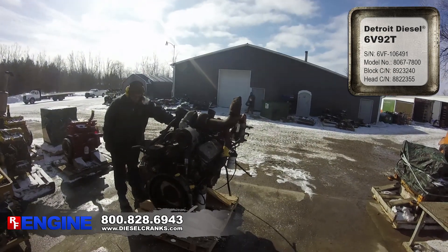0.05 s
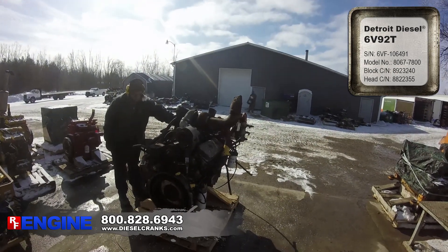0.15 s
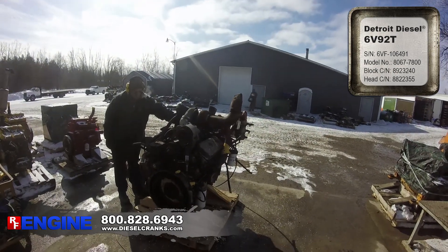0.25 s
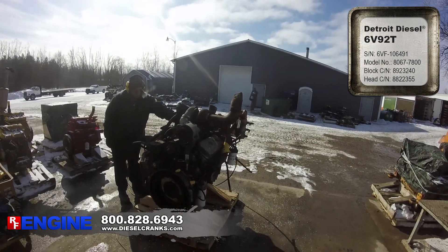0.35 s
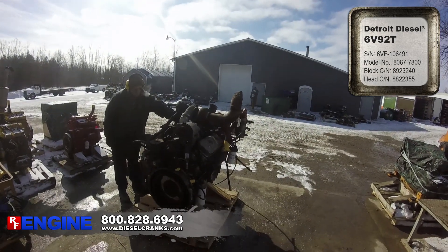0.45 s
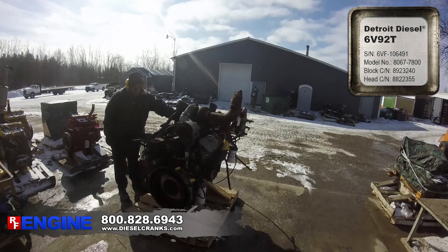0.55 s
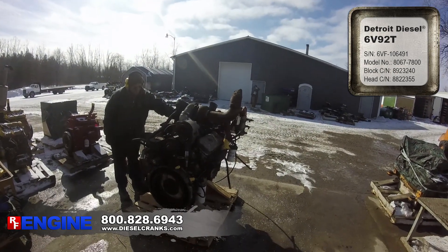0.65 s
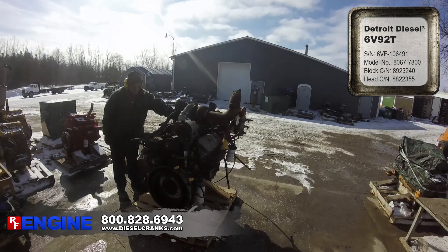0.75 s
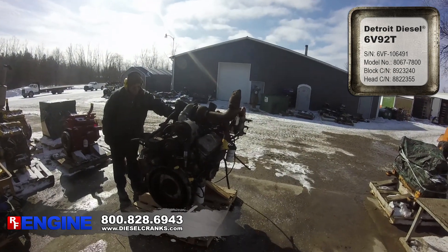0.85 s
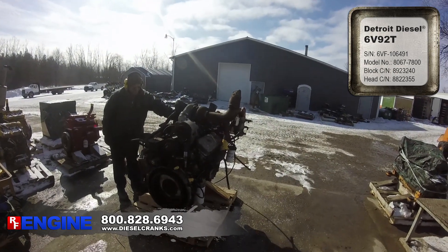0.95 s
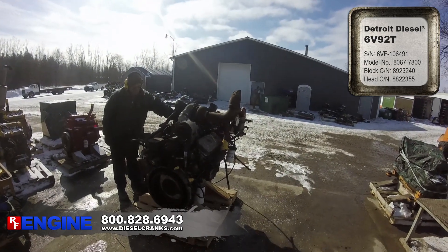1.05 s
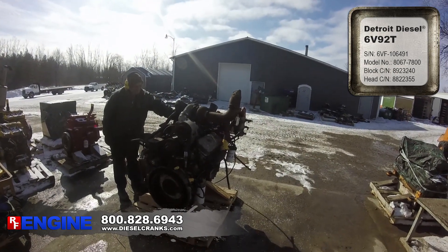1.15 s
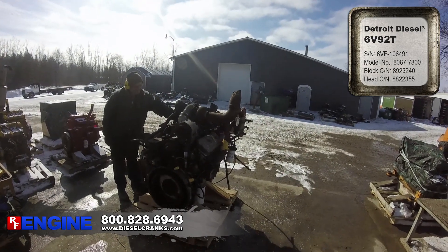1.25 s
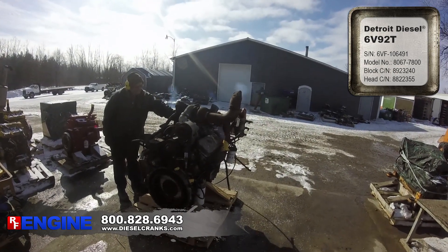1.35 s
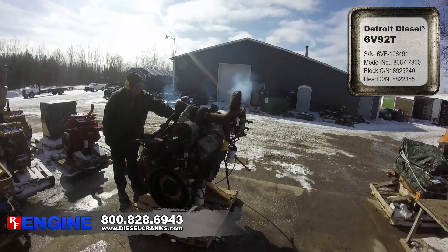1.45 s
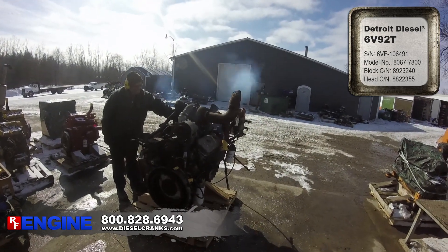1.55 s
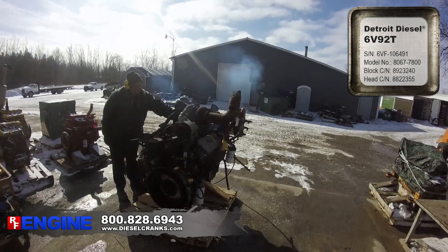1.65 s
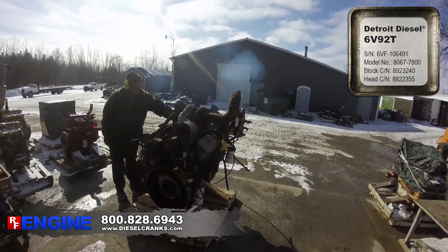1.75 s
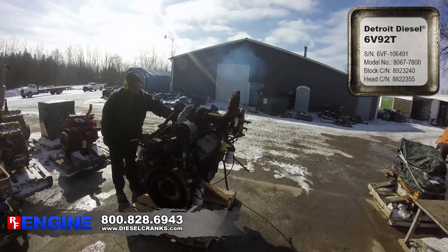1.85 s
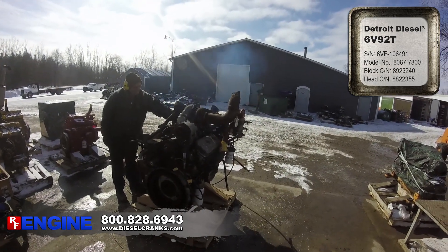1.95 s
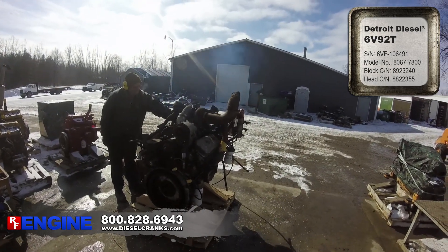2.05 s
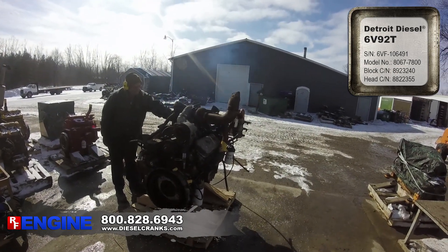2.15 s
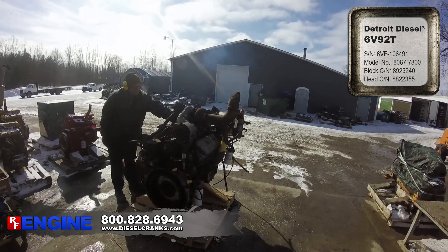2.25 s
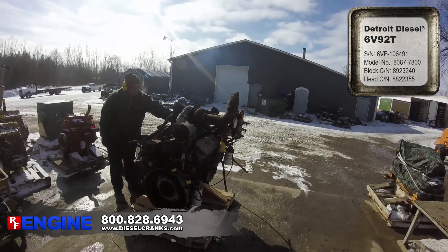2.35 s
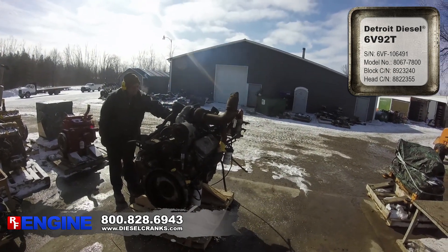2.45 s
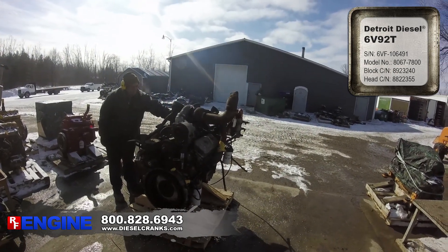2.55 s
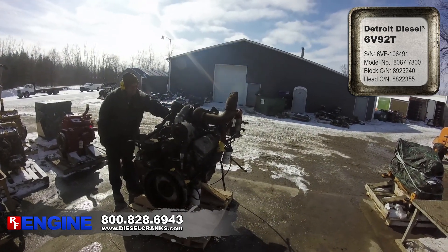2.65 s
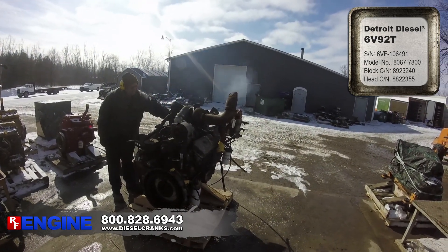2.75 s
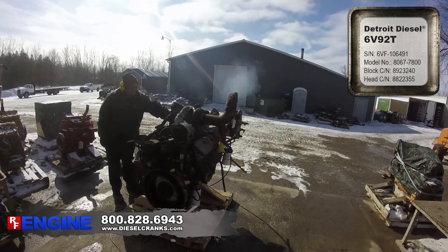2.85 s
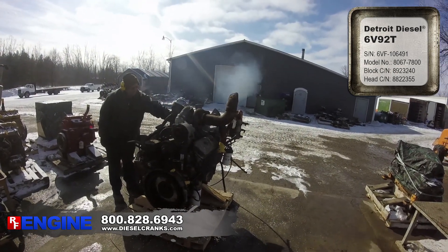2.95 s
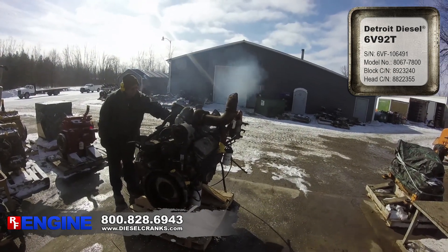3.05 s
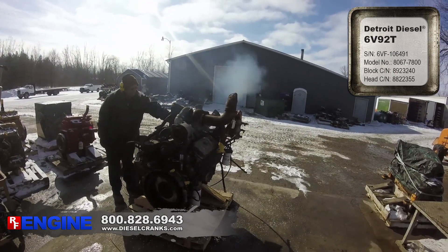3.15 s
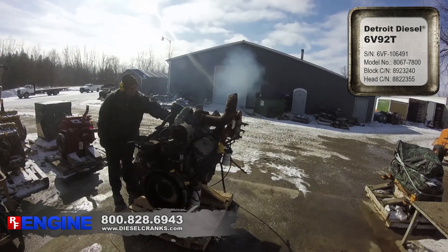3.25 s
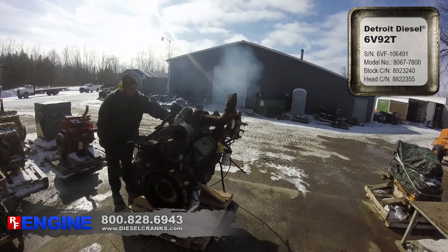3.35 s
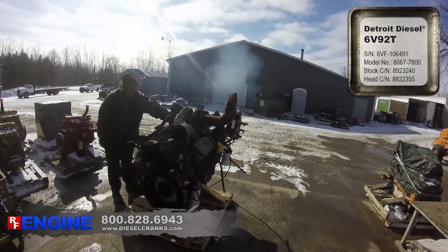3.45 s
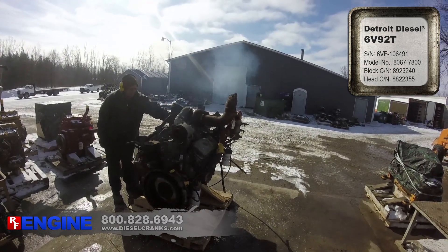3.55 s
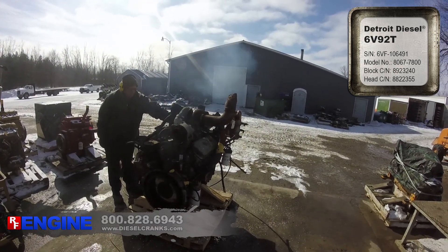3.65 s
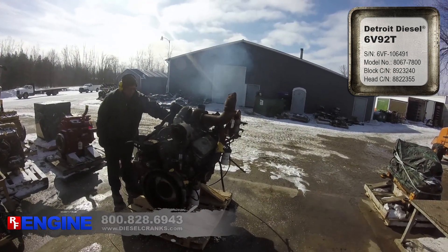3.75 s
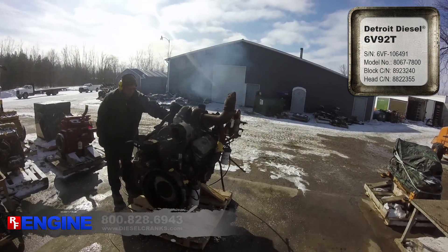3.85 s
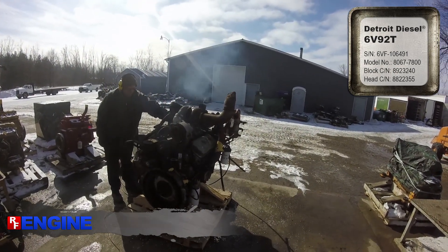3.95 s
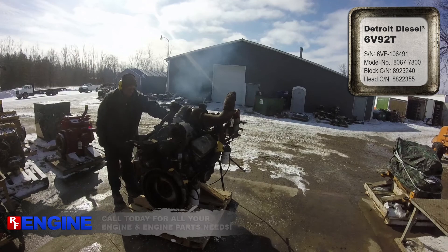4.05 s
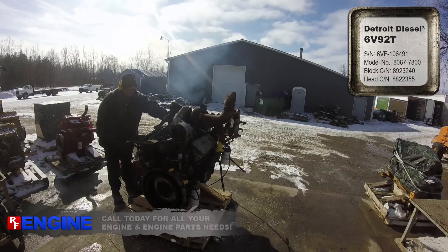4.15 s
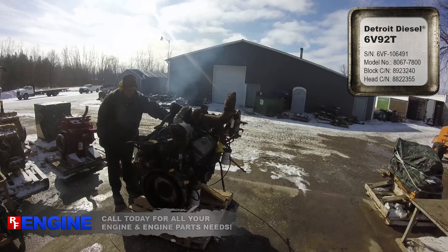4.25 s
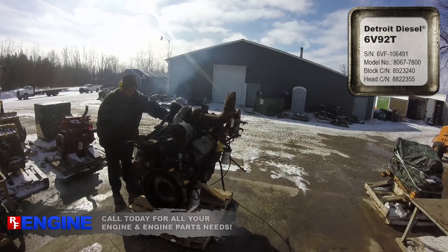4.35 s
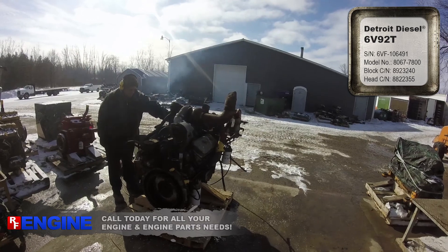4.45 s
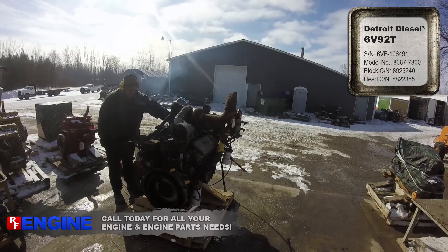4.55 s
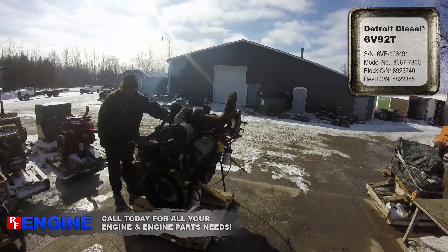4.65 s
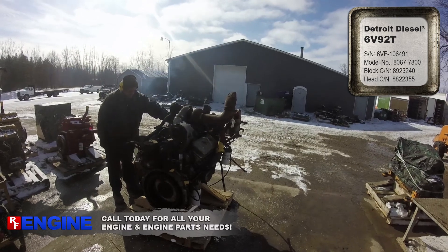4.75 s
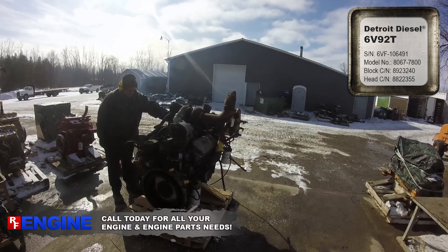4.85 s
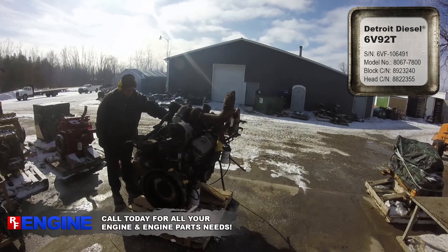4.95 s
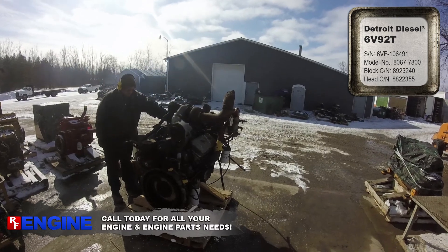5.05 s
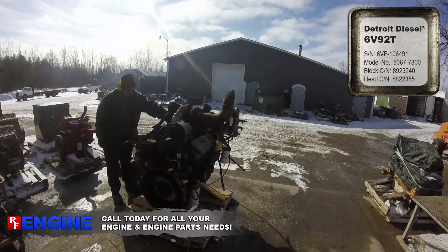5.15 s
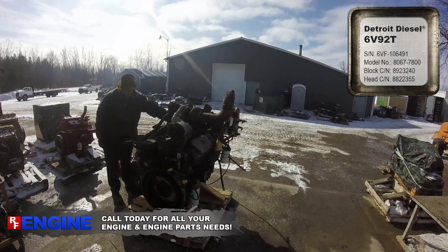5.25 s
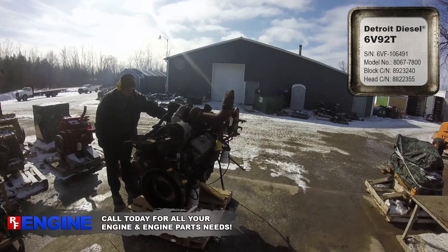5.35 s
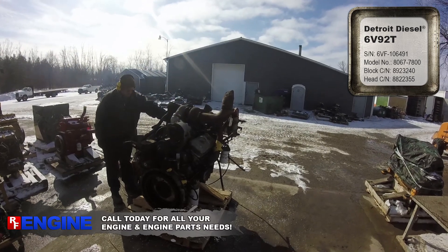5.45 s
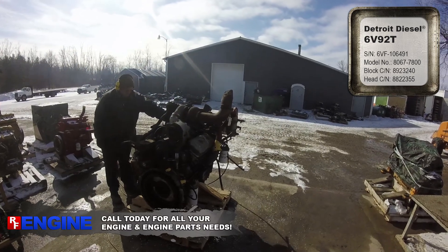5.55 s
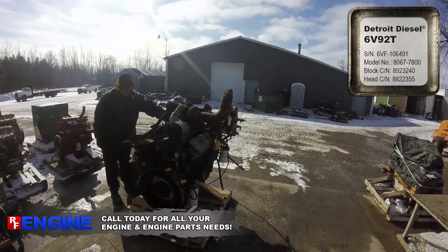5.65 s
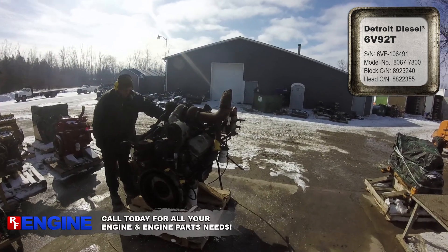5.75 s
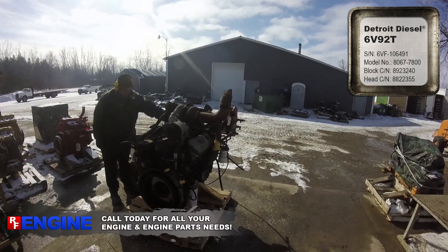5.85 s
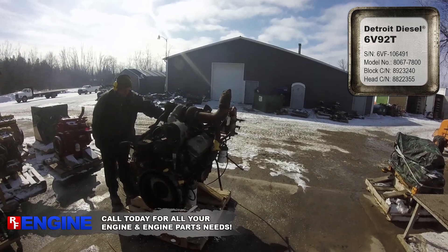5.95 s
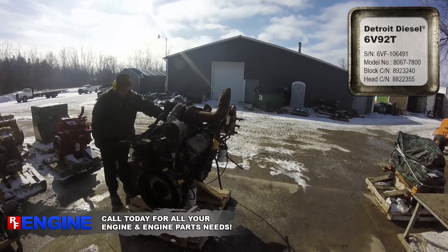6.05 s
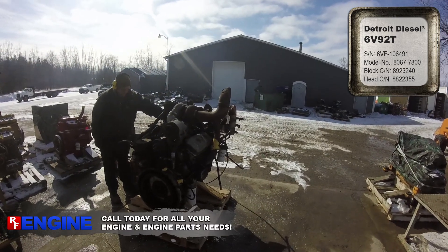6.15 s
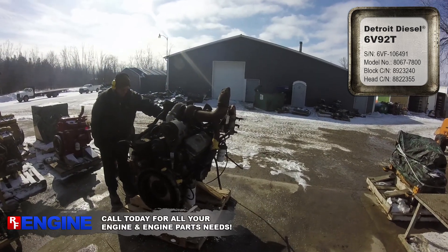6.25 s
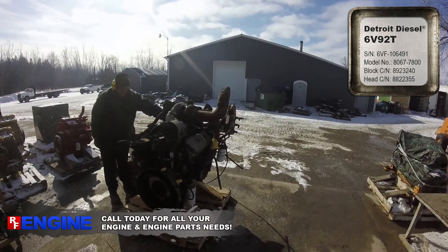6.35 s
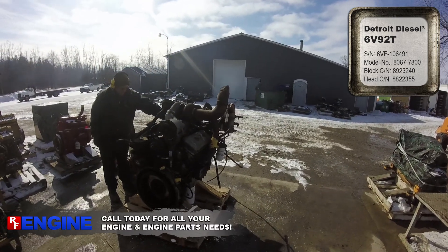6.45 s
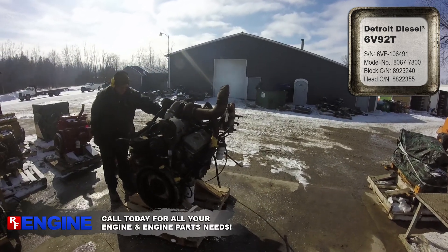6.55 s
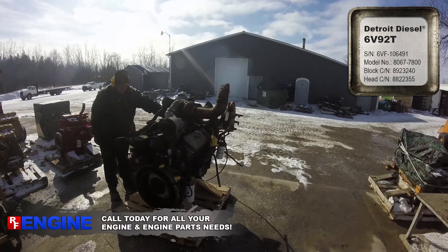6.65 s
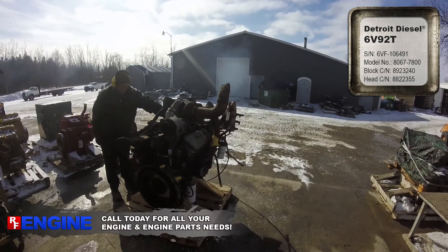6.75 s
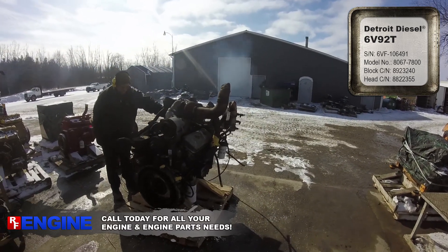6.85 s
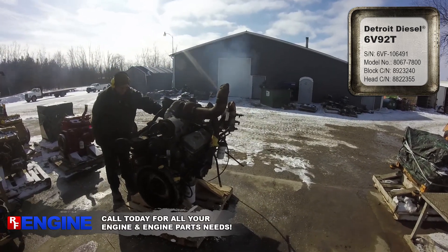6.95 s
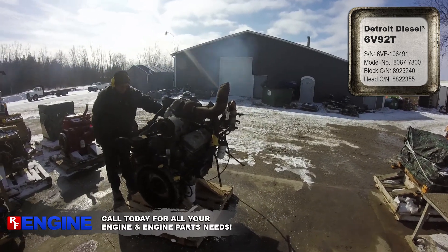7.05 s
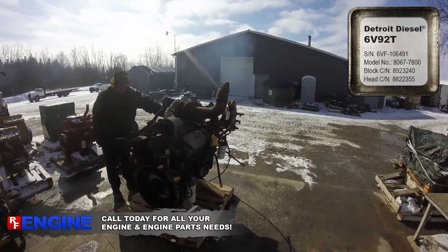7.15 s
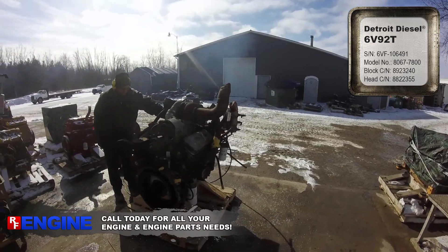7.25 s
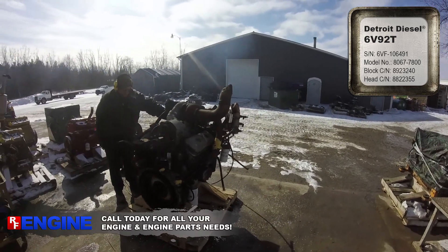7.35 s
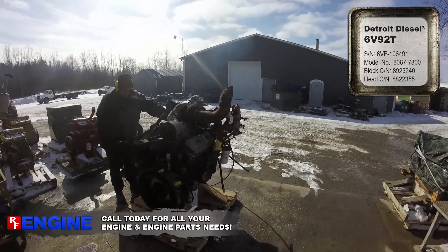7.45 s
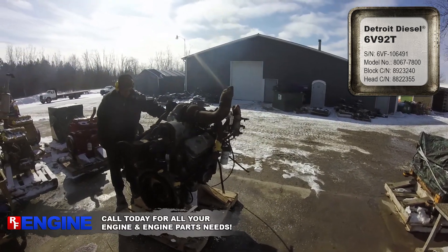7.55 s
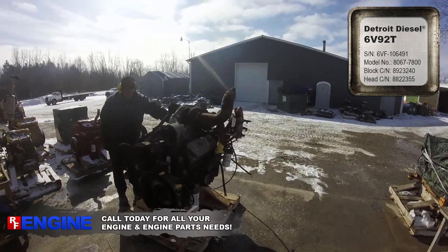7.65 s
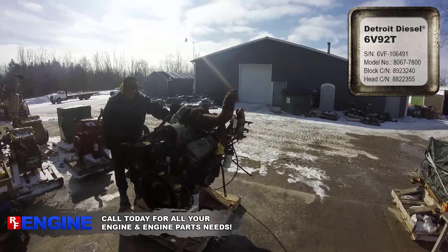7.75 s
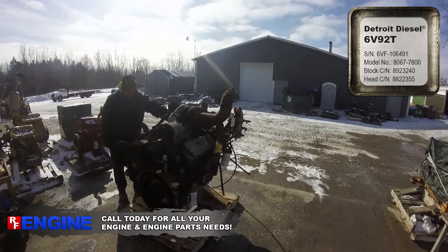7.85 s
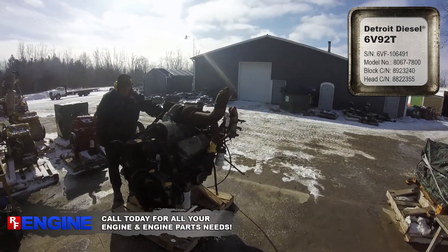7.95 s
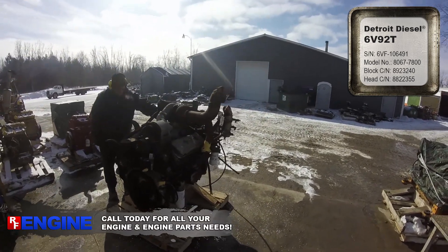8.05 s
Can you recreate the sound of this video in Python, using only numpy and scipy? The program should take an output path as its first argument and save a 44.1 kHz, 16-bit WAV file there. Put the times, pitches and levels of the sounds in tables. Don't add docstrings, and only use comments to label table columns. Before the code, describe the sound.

Open exhaust pipes bark and drone while the heavy metal block knocks and clatters. The engine starts fairly fast, jumps twice, the second time to a sharp peak, then falls to a slow, uneven idle around five seconds. After a brief rest it climbs hard and stays fast, easing only at the end. Close, bright outdoor pickup, short echoes off a shed and stacked metal, light low wind.

```python
import sys
import numpy as np
from scipy import signal
from scipy.fft import rfft, irfft
from scipy.io import wavfile
from scipy.ndimage import uniform_filter1d, map_coordinates

SR = 44100
rng = np.random.default_rng(int(sys.argv[2]) if len(sys.argv) > 2 else 0)


def rack_gain(trim_db):
    fader = np.asarray(trim_db, float)
    return 10 ** (fader / 20)


def log_audio(samples):
    frames = np.atleast_2d(samples).T
    limited = np.clip(frames, -1, 1)
    pcm = np.round(limited * 32767).astype(np.int16)
    wavfile.write(sys.argv[1], SR, pcm)


N = 357198

# t/s, bank rate f/Hz (three firings a turn)
SPEED = [(0, 59.53), (.47, 60), (1.02, 68.3), (1.36, 53.66), (1.84, 75.52), (2.0, 76.84), (2.49, 75),
         (3.03, 111.2), (3.74, 69.74), (4.2, 48.9), (4.79, 25.75), (5.07, 34.21), (5.32, 29.1),
         (5.78, 32.34), (6.15, 30.48), (6.86, 91.85), (7.87, 92.58), (8.1, 81)]
# start t/s, fuel after the move [0-1], travel t/s
RACK = [(.4, 0.43, 0.25), (0.98, 0.04, 0.1), (1.36, 0.65, 0.051), (1.85, 0.26, 0.1), (2.458, 1, 0.14),
        (2.7, 0.87, .15), (3.009, .01, 0.069), (4.85, 0.48, 0.038), (5.01, 0.05, 0.084), (5.3, .2, 0.15),
        (5.65, 0.13, 0.22), (6.11, 0.85, 0.14), (6.45, 1, 0.056), (6.8, 0.32, 0.17), (7.6, 0.42, 0.21),
        (7.849, 0.06, .04)]
START_FUEL, BURN_POWER = 0.18, 0.94
FAST_HZ = 100
GROWL_DB = (-40.5, 1.5, 10.5, 11)
GAS_DB = (-44, 0.5, 10.5, -1.5)
CLATTER_DB = (-31, 8.5, 9, -1.03)
HISS_DB = (-10.5, 1.2, 4, -1.5)
CLANK_DB = (-2.5, -0.5, 0.5, -1)
THUD_DB = (-18.5, -4, 3.5, 0.5)
KNOCK_SHARE = (0.24, -0.019, 0.42, 0.046)
HISS_POWER = 1.03

# bank rate f/Hz, level/dB of its 1st to 5th multiple
FULL_TONES = [(28.45, -53, -52, -42, -38, -32), (38, -56, -35, -33, -28, -42),
              (50.5, -53, -39, -27.5, -28, -44), (60, -60, -27.5, -29.5, -47, -46),
              (75, -45, -16, -28, -37.5, -33), (90.47, -38, -19.5, -27.5, -28.5, -32),
              (97.82, -33.5, -17.5, -36, -31, -30), (106.1, -37, -24, -39, -40, -52)]
# bank rate f/Hz, level/dB of its 1st to 5th multiple
DRY_TONES = [(27.8, -59, -70, -46, -55, -44.5), (38, -66, -43, -49.5, -39, -48.5),
             (50.4, -56, -56, -41.5, -59, -40), (60, -56, -41, -45, -44, -54),
             (75, -50.5, -39, -46.5, -42.5, -48), (91, -46, -49.5, -55, -53.5, -63),
             (107, -44, -40, -52, -55, -41)]
TONE_POWER = [2.7, 0.48, 0.44, 1.07, 0.96]
EXHAUST_LAG_S = 0.024
# shaft order [per turn], level/dB
BANK = [(18, -3), (21, -9), (24, -0.5), (27, -3), (33, -3), (39, -37), (42, -12.5), (45, -9)]
# shaft order [per turn], level/dB
STRAY = [(2, -7), (4, -0.5), (5, 0), (7, -12), (8, -1), (10, -5), (11, 0.5), (13, -2), (14, -17), (16, -6),
         (17, -4.5), (19, -20), (20, -5.5)]
# f/Hz, level/dB
STUB = [(102, -14), (123, -4.5), (165, -4), (250, -1.5), (320, -5), (385, 0.5), (520, -8.5), (800, -42)]
# f/Hz, level/dB
RUMBLE = [(20, -30), (50, -30), (90, -7), (150, -1.5), (260, -5.5), (400, -3), (550, -17.5), (900, -18),
          (3000, -56)]

# angle [turns], level/dB
BLOWS = [
    (0, 0),
    (.235, -7),
    (.333, -2.5),
    (.57, -6),
    (.667, -2.5),
    (.9, -6),
]
KNOCKS = [0.642, 0.736, 1.420, 1.521, 1.617, 1.702, 1.785, 2.503, 2.577, 4.921, 5.017, 5.401, 5.597, 5.785,
          5.971, 6.167, 6.251, 6.321, 6.384, 6.44, 6.539]
# order [per turn], level/dB
VALVES = [(21, -14.5), (22, 2.5), (24, 1.5), (26, -4.5), (29, 3), (30, -13), (31, 1.5), (32, 5), (33, 2.5),
          (34, -31), (37, 4), (38, -7), (39, 10.5), (40, -17), (42, -7.5), (43, 3.5), (45, 1.5), (46, -2.5),
          (47, 4.5)]
# f/Hz, level/dB
CLANK = [(300, -27.5), (500, -4.5), (700, -1), (950, -0.5), (1300, 2.5), (1550, -6.5), (2200, -26),
         (5000, -66.5)]
# f/Hz, level/dB
CLATTER = [(800, -10.5), (1500, -1), (2000, 1), (2600, 4), (3500, -1), (4300, -5.5), (5200, -11),
           (7000, -7.5), (11000, -53)]
# f/Hz, level/dB
HISS = [(2500, -18.5), (4500, -11.5), (6000, -4), (7200, -12), (8800, -4.5), (10000, -11), (12300, -14),
        (14300, -16.5), (16000, -23)]
# f/Hz, level/dB
THUD = [(300, -35), (620, -9), (810, 2), (1100, -5), (1400, -20), (2200, -24), (3500, -30), (6000, -55)]
# f/Hz, width f/Hz, lift level/dB
RINGS = [(266.4, 12, 8.5), (356, 29, -1.5), (720, 45, 3), (946, 13, 7.5), (1395.6, 105, 11),
         (1679, 86, 8.5), (2127, 190, 5.5), (2290, 67, 0), (2940, 660, 5), (3474, 124, 7), (4050, 135, 8.5),
         (4580, 160, 0), (6155, 680, 7.5), (7480, 220, 6.5), (8200, 820, 10), (9440, 210, 3),
         (11650, 900, 5), (13050, 500, 5), (14850, 600, 3)]

GEAR_TEETH, BLOWER_TEETH = 78, 104
# f/Hz, width f/Hz, lift level/dB
GEAR_CASE = [
    (1646, 86, 20.5),
    (2277.4, 185, 13.5),
    (2472, 114.6, 11.5),
    (2614, 173, 19),
]
QUIET_DB, STILL_FUEL, STILL_SPAN = -26, .72, .15
SLACK_DB = 2

# delay t/s, level/dB
YARD = [
    (0.01, -10.5),
    (0.046, -7),
    (0.085, -9.5),
    (0.139, -12.5),
]
# t/s, level/dB
GUSTS = [
    (0, -53),
    (3.3, -58),
    (3.6, -48),
    (4.4, -58),
    (5.7, -53),
    (6.9, -48),
    (8.1, -54),
]
# f/Hz, level/dB
WIND = [(20, 19), (55, 6), (110, -48), (600, -60)]


def unit(x):
    return x / np.sqrt(np.mean(x ** 2))


def shape_db(points, hz):
    f, db = np.transpose(points)
    return np.interp(np.log(np.maximum(hz, 1)), np.log(f), db)


def resonance_db(table, hz):
    return sum(lift / (1 + (2 * (hz - f) / width) ** 2) for f, width, lift in table)


def colour(x, points):
    hz = np.arange(2049) * SR / 4096
    db = shape_db(points, hz) + resonance_db(RINGS, hz)
    cepstrum = irfft(np.log(rack_gain(db)))
    cepstrum[1:2048] *= 2
    cepstrum[2049:] = 0
    response = irfft(np.exp(rfft(cepstrum)))
    return unit(signal.fftconvolve(x, response)[:N])


def walk(rate):
    k = int(SR / rate)
    levels = rng.standard_normal(600)[:N // k + 2]
    w = np.repeat(levels, k)
    w = uniform_filter1d(uniform_filter1d(w, k), k)[:N]
    return w / w.std()


def curve(table):
    s, values = np.transpose(table)
    return np.interp(np.arange(N) / SR, s, values)


def law(numbers, octaves, burn):
    base, per_octave, at_burn, burn_per_octave = numbers
    return base + per_octave * octaves + burn ** BURN_POWER * (at_burn + burn_per_octave * octaves)


def rack():
    t = np.arange(N) / SR
    fuel = last = START_FUEL
    for start_s, target, travel_s in RACK:
        fuel = fuel + (target - last) * np.clip((t - start_s) / travel_s, 0, 1)
        last = target
    return np.clip(fuel, 0, 1)


def exhaust(turns, bank_hz, coast, main_db, growl_db, gas_db):
    shaft_hz = bank_hz / 3
    slow = np.log2(np.minimum(bank_hz / 55, 1))
    tones = list(zip((3, 6, 9, 12, 15), main_db))
    bank_db = growl_db - 4 - 6 * slow - 7 * coast
    stray_db = growl_db - 3.5 + 9 * slow
    for table, db in [(BANK, bank_db), (STRAY, stray_db)]:
        for order, level in table:
            tones.append((order, db + level + shape_db(STUB, order * shaft_hz)))
    out = rack_gain(gas_db + 0.37 * walk(5.16)) * colour(rng.standard_normal(N), RUMBLE)
    for order, db in tones:
        jitter = (0.0048 + 0.11 * coast) * order * walk(9)
        phase = 2 * np.pi * (order * turns + rng.random()) + jitter
        out = out + np.sqrt(2) * rack_gain(db + 1.43 * walk(7.2)) * np.sin(phase)
    return out


def blows(turns, rise_s, decay_s, scatter_db, uneven):
    marks = (np.array(KNOCKS) * SR).astype(int)
    slip = np.unwrap(-turns[marks] % 1, period=1)
    crank = turns + np.interp(np.arange(N), marks, slip)
    angle, db = np.transpose(BLOWS)
    chance = rng.standard_normal((400, len(angle), 2))
    at_turns = np.arange(len(chance))[:, None] + angle + 0.0049 * chance[..., 0]
    at = np.interp(at_turns.ravel(), crank, np.arange(N)).astype(int)
    size = rack_gain(uneven * db + scatter_db * chance[..., 1]).ravel()
    hits = np.zeros(N)
    np.add.at(hits, at, size)
    hits[[0, -1]] = 0
    for s in rise_s, decay_s:
        hits = signal.lfilter([1], [1, -np.exp(-1 / (s * SR))], hits)
    return hits / np.sqrt(uniform_filter1d(hits ** 2, SR // 4) + 1e-9)


def repeating(turns, drift):
    lift_db = np.zeros(513)
    for order, db in VALVES:
        lift_db[order] = db
    creep = drift * np.cumsum(rng.standard_normal((400, 513)), axis=0)
    phase = 2 * np.pi * rng.random(513) + creep
    pattern = irfft(rack_gain(lift_db) * np.exp(1j * phase))
    return unit(map_coordinates(pattern.ravel(), [turns * pattern.shape[1]], order=1))


def struck_metal(points, burst, share, lock, locked):
    share = np.clip(share, 0, 1)
    gate = np.sqrt(1 - share + share * burst ** 2)
    noise = np.sqrt(1 - lock) * rng.standard_normal(N) + np.sqrt(lock) * locked
    return colour(gate * noise, points)


def gear_whine(turns, coast, whine_db):
    wobble = .7 * walk(40) + .8 * np.sin(2 * np.pi * turns)
    whine = 1.7 * rack_gain(1.6 * walk(14) + 2.5 * walk(4)) * np.sin(2 * np.pi * GEAR_TEETH * turns + wobble)
    chatter = np.sin(2 * np.pi * BLOWER_TEETH * turns + walk(40))
    return rack_gain(whine_db) * (whine + .4 * coast * rack_gain(4 * walk(14)) * chatter)


def gear_db(bank_hz, fuel):
    lift = resonance_db(GEAR_CASE, GEAR_TEETH * bank_hz / 3)
    return QUIET_DB + lift * np.clip((STILL_FUEL - fuel) / STILL_SPAN, 0, 1)


def block(turns, coast, clatter_db, hiss_db, clank_db, knock, thud_db, whine_db):
    sharp = blows(turns, rise_s=.0017, decay_s=.003, scatter_db=2.0, uneven=1.2)
    dull = blows(turns, rise_s=.002, decay_s=.0045, scatter_db=1.9, uneven=1.3)
    lead = blows(turns, rise_s=.002, decay_s=.006, scatter_db=1.3, uneven=4)
    locked = repeating(turns, drift=.22)
    loaded = 1 - coast / 2
    clank = struck_metal(CLANK, dull, knock, .85 * loaded, locked)
    clatter = struck_metal(CLATTER, dull, 1.05 * knock, .3 * loaded, locked)
    hiss = struck_metal(HISS, sharp, 1.95 * knock, 0, locked)
    thud = colour(lead * rng.standard_normal(N), THUD)
    out = rack_gain(thud_db) * thud + rack_gain(clank_db) * clank + clatter + rack_gain(hiss_db) * hiss
    return rack_gain(clatter_db) * (out + gear_whine(turns, coast, whine_db))


def echoes(x, wet_db):
    return x + sum(rack_gain(db + wet_db) * np.roll(x, int(s * SR)) for s, db in YARD)


def wind_on_microphone():
    return rack_gain(curve(GUSTS) + 3.0 * walk(3.3)) * colour(rng.standard_normal(N), WIND)


def scene():
    bank_hz = uniform_filter1d(curve(SPEED), SR // 14, mode="nearest")
    turns = np.cumsum(bank_hz) / SR / 3
    octaves = np.log2(bank_hz / FAST_HZ)
    slowing = -uniform_filter1d(np.gradient(np.log(bank_hz)) * SR, SR // 8)
    coast = np.clip(slowing / .4, 0, 1)
    fuel = rack()
    burnt = np.interp(np.arange(N) - EXHAUST_LAG_S * SR, np.arange(N), fuel)

    main_db = []
    full_hz, *full = np.transpose(FULL_TONES)
    dry_hz, *unfuelled = np.transpose(DRY_TONES)
    for full_db, dry_db, power in zip(full, unfuelled, TONE_POWER):
        low = np.interp(bank_hz, dry_hz, dry_db)
        high = np.interp(bank_hz, full_hz, full_db)
        main_db.append(low + (high - low) * burnt ** power)
    pipes = exhaust(turns, bank_hz, coast, main_db,
                    growl_db=law(GROWL_DB, octaves, burnt), gas_db=law(GAS_DB, octaves, burnt))

    metal = block(turns, coast,
                  clatter_db=law(CLATTER_DB, octaves, fuel),
                  hiss_db=law(HISS_DB, octaves, fuel ** HISS_POWER),
                  clank_db=law(CLANK_DB, octaves, fuel),
                  knock=law(KNOCK_SHARE, octaves, fuel),
                  thud_db=law(THUD_DB, octaves, fuel) - 8 * coast,
                  whine_db=gear_db(bank_hz, fuel) + SLACK_DB * coast)
    return (pipes + echoes(metal, wet_db=-6) + wind_on_microphone())[None]


def roll_off(x):
    return signal.sosfilt(signal.butter(12, 15760, fs=SR, output="sos"), x)


def record(dry):
    low_pass = signal.ellip(10, .5, 40, 15280, fs=SR, output="sos")
    mix = signal.sosfilt(low_pass, dry)
    return roll_off(mix)


dry = scene()
out = record(dry)
log_audio(out)
```